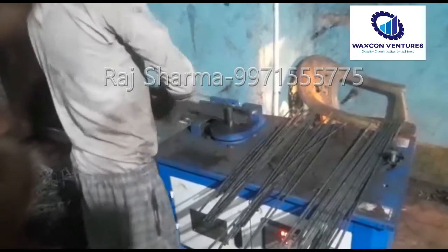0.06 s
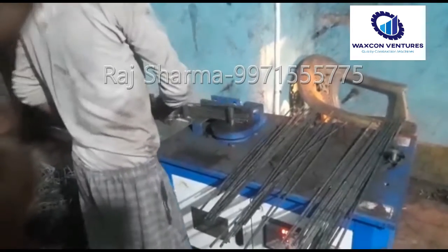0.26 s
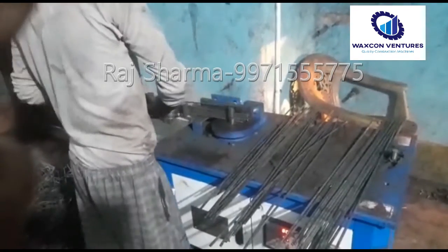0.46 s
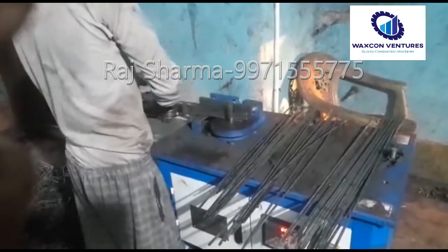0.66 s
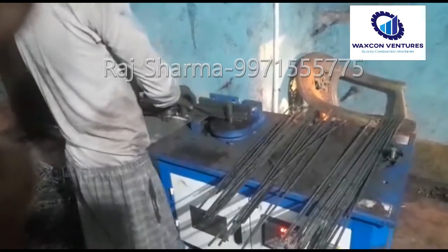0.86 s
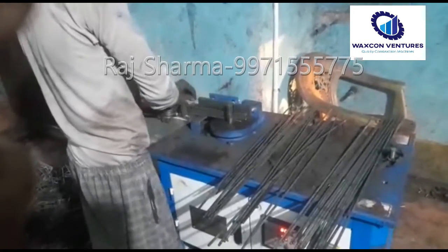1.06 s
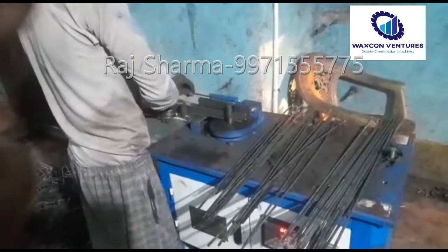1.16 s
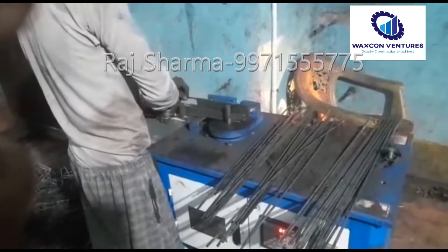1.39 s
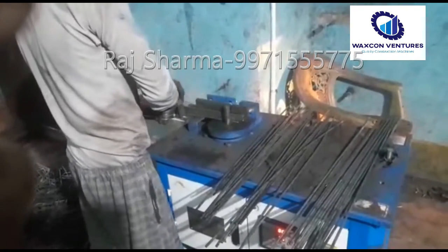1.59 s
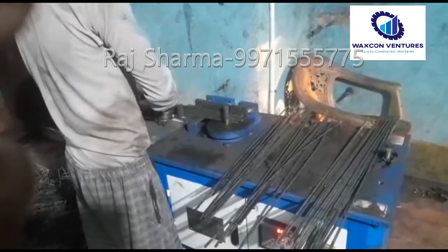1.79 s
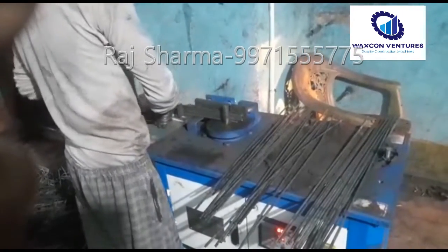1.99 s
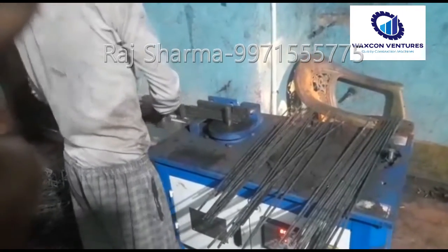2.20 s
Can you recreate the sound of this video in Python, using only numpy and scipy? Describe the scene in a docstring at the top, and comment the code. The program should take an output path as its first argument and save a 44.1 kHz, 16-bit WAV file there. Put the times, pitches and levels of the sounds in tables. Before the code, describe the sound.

Steel rods clank on a metal machine table over a steady motor hum.

```python
"""A hard-walled workshop, where steel rods clank on the steel table of a bending machine.
One heavy triple clank is followed by lighter knocks and clinks as the rods are set in place.
Each impact excites the damped normal modes of table and rods; the bundle's dense modes merge into
a crash that reverberates. A motor hums throughout, over workshop noise and an uneven low rumble."""
import sys
import numpy as np
from scipy import signal
from scipy.fft import rfft, irfft
from scipy.io import wavfile
from scipy.ndimage import uniform_filter1d, map_coordinates

SR = 44100
rng = np.random.default_rng(int(sys.argv[2]) if len(sys.argv) > 2 else 0)


def master_out(mix):
    """Clip the mix to full scale and print it as 16-bit PCM to the path in sys.argv[1]."""
    frames = np.transpose(np.atleast_2d(mix))
    ceiling = np.clip(frames, -1, 1)
    pcm = np.round(ceiling * 32767).astype(np.int16)
    wavfile.write(sys.argv[1], SR, pcm)


N = 99225
TIME, BIN_HZ = np.arange(N) / SR, np.fft.rfftfreq(N, 1 / SR)

# Bands of the impact spectrum, from thud to sizzle: (frequency [Hz])
IMPACT_BANDS = [400, 900, 1150, 1700, 2900, 5000, 11000]
# Impacts of rod on steel: (time [s], level in each of the seven bands [dB],
# free ringing of the rods [dB], note of the struck spot [Hz], level of that note [dB])
IMPACTS = [(0.040, -10.5, -17.5, -16.5, -15.5, -40, -19, -26, 13, 4430, -38),
           (0.178, -12.5, -26, -13, -20, -26, -20, -27.5, -3, 10230, -40.5),
           (0.229, -16, -1, -3.5, -1.5, -9, -5.5, -6.5, 4.5, 1045, -6),
           (0.263, -1, 3, -5, 7, -3, -1, -2, -18, 2604, -9),
           (0.276, 2.5, -3.5, -8, -15, -2, -10, -4, -5, 926, -12),
           (0.300, -4.5, -46, -15, -22, -28, -13, -6, -8, 2670, -17),
           (0.335, -2, -3.5, -26, -26, -7.5, -1.5, -4, -4, 1049, -12),
           (0.344, -19, -4, -8.5, -2, -12, -18, -1, -1, 1097, -7.5),
           (0.371, -12.5, -15, -38, -15, -19.5, -0.5, -11.5, 10, 5250, -40),
           (0.870, -37, -25, -27, -32, -23, -26.5, -21.5, -7, 12900, -41),
           (1.381, -16.5, -38, -28, -26, -28, -15, -17, 9, 13600, -34),
           (1.419, -4.5, -12, -13, -24, -7.5, -15.5, -14.5, 0, 2940, -24.5),
           (1.599, -23, -35, -31, -23, -19.5, -21, -28, -14, 4900, -39),
           (1.623, -16.5, -59, -31, -32, -43, -26, -21, -1, 10000, -37),
           (1.681, -9, -13, -20, -51, -5, -16.5, -19, 0, 3082, -21),
           (1.775, -4, -17, -19.5, -10.5, -18.5, -7, 0, -11, 9500, -22.5),
           (2.162, -14, -27, -43, -19.5, -25, -30, -42, 3, 327, -26)]
def struck_modes(modes, extra_db, scatter_db, rise_s):
    """Modal superposition: every impact excites the same damped modes in a different balance."""
    out, t = np.zeros((2, N)), np.arange(SR) / SR
    detune = 0.00197  # relative spread of frequency from impact to impact
    for hz, db, t60 in modes:
        mode = np.zeros((2, N))
        envelope = undb(db) * decay(t, t60) * (1 - np.exp(-t / rise_s))
        draws = rng.standard_normal((len(IMPACTS), 4))
        for (start, *spectrum, _, _, _), extra, draw in zip(IMPACTS, extra_db, draws):
            tune, size, phase, skew = draw
            strength = undb(at_hz(hz, IMPACT_BANDS, spectrum) + extra + scatter_db * size)
            add(mode, start, tone(t, hz * (1 + detune * tune), phase, skew) * envelope * strength)
        out += mode * flutter(hz)
    return out


# Normal modes of the steel table: (frequency [Hz], level [dB], decay time T60 [s])
TABLE_RESONANCES = [(260.7, -40, 1.1), (308.6, -35.5, 1.32), (405.5, -27.5, 0.79), (422.6, -31.5, 1.18),
                    (448, -39, 0.56), (490.8, -31.5, 0.78), (522, -51.5, 0.87), (591, -41, 1),
                    (865, -32.5, 0.45), (905, -30.5, 0.85), (930, -27, 0.47), (961, -34, 0.35),
                    (1084, -30.5, 1.05), (1178, -30, 0.44), (1639, -27, 0.21), (1640, -41, 0.64),
                    (2070, -40, 0.83)]
def steel_table():
    """Plate vibration: the ring builds as each impact spreads through the table."""
    return struck_modes(TABLE_RESONANCES, np.full(len(IMPACTS), 2.5), scatter_db=1.5, rise_s=0.015)


# Normal modes of the rods: (frequency [Hz], level [dB], decay time T60 [s])
ROD_RESONANCES = [(2530, -35, 1), (2597, -29.5, 0.43), (2550, -30, 0.47), (3130, -28, 0.48),
                  (3160, -35, 0.32), (3500, -56, 0.13), (4020, -33.5, 0.76), (4200, -43, 0.32),
                  (4680, -43, 0.28), (5240, -47.5, 1), (5580, -45, 0.8), (6290, -37, 0.27),
                  (10160, -39, 0.5), (11413, -40, 0.45), (11930, -45, .3), (12030, -32.5, 0.41),
                  (12700, -36.5, 0.41), (13900, -37, 0.48), (15580, -32, 0.32)]
def rods():
    """Free vibration of bars: each contact favours different modes of the rods."""
    free_db = np.array([free for *_, free, _, _ in IMPACTS])
    return struck_modes(ROD_RESONANCES, free_db - 2, scatter_db=3, rise_s=0.001)


def struck_spots():
    """Local resonance: each struck spot sounds a heavily damped note that leaves a trace in the room."""
    out, t = np.zeros((2, N)), np.arange(SR // 2) / SR
    envelope = decay(t, t60=0.04) + undb(-14) * decay(t, t60=0.34)
    for (start, *_, hz, db), (phase, skew) in zip(IMPACTS, rng.standard_normal((len(IMPACTS), 2))):
        add(out, start, tone(t, hz, phase, skew) * undb(db) * envelope * swell(t, hz))
    return out


# Crash of the rod bundle: (frequency [Hz], third-octave level [dB], crash T60 [s],
# room tail relative to the crash [dB], room T60 [s])
BUNDLE_BANDS = [(148, -44, .2, -1.5, 1.0), (267, -47, 0.16, -3, 1.0), (444, -24, 0.29, -6, 1.0),
                (756, -35.5, 0.2, -12.5, 1), (1057, -23, 0.12, -5, 1), (1560, -32, 0.13, -6.5, 0.99),
                (2750, -24, 0.075, -3.5, 0.74), (5480, -22.5, 0.13, -5.5, 0.74),
                (8200, -37, 0.13, -8.5, 0.24), (10510, -21, 0.11, -12, 0.57), (13100, -20, 0.073, -8, 0.27),
                (16000, -31.5, 0.054, -19, 0.31)]
def bundle_clatter():
    """Modal overlap: the bundle's close modes merge into a brief noise that lingers as reverberation."""
    out = np.zeros((2, N))
    points, *columns = np.array(BUNDLE_BANDS).T
    spacing_hz, ripple_db, ripple_from_hz, room_rise_s = 55.31, 6.5, 5400, 0.004
    peaks = map_coordinates(rng.standard_normal(2048), [BIN_HZ / spacing_hz], order=1, mode="mirror")
    # single modes stand out more in the treble
    ripple = undb(ripple_db * peaks * BIN_HZ / np.hypot(BIN_HZ, ripple_from_hz))
    for hz in 160 * 2 ** (np.arange(21) / 3):
        db, crash_t60, room_db, room_t60 = (at_hz(hz, points, column) for column in columns)
        crash = decay(TIME, crash_t60)
        room = undb(room_db) * decay(TIME, room_t60) * (1 - np.exp(-TIME / room_rise_s))
        impact_power = (crash ** 2 + room ** 2) * swell(TIME, hz) ** 2
        power = np.zeros((1, N))
        for start, *spectrum, _, _, _ in IMPACTS:  # incoherent sounds add in power
            add(power, start, impact_power[None] * undb(at_hz(hz, IMPACT_BANDS, spectrum)) ** 2)
        band = np.sqrt(np.maximum(1 - 3 * abs(np.log2((BIN_HZ + 1) / hz)), 0))
        out += undb(db) * np.sqrt(power) * stereo_noise(band * ripple, stereo_width(BIN_HZ))
    return out


# Spectral lines of the motor: (frequency [Hz], level [dB])
MOTOR_LINES = [(99, -58.5), (316, -45), (411, -54), (452, -50.5), (526, -60.5), (737, -66), (1174, -60.5)]
def motor():
    """Random modulation: each line of the hum wavers in amplitude and phase."""
    out, depth = np.zeros(N), 1.1
    for hz, db in MOTOR_LINES:
        waver = 1 + depth * (wander(per_s=15) + 1j * wander(per_s=15))
        line = np.real(waver * np.exp(2j * np.pi * hz * TIME))
        out += undb(db) * line / line.std()
    return out


# Spectrum of the workshop noise: (frequency [Hz], relative spectral density [dB])
NOISE_SPECTRUM = [(30, -35), (100, -6.5), (200, 0.5), (300, 3), (450, 2), (620, -2.5), (1200, -5),
                  (1600, -11.5), (2800, -6.5), (5000, -15.5), (6200, -20), (7400, -34), (11000, -29),
                  (16000, -34)]
# Envelope of the workshop noise: (time [s], level [dB])
NOISE_ENVELOPE = [(0, -37.5), (.7, -38.5), (1.05, -41.5), (1.35, -41.5), (1.75, -39.5), (1.95, -37),
                  (2.25, -38)]
def workshop_noise():
    """Broadband noise: machines give a continuous spectrum whose level drifts slowly."""
    return shaped_noise(NOISE_SPECTRUM, NOISE_ENVELOPE, stereo_width(BIN_HZ))


# Spectrum of the rumble: (frequency [Hz], relative spectral density [dB])
RUMBLE_SPECTRUM = [(20, -25), (45, -2), (90, -1), (170, -1.5), (260, -15.5), (600, -49)]
# Envelope of the rumble: (time [s], level [dB])
RUMBLE_ENVELOPE = [(0, -39.5), (.1, -40), (.135, -33), (.21, -33), (.3, -42), (.52, -38.5), (.62, -43),
                   (.76, -54.5), (.96, -43.5), (1.02, -50), (1.3, -50.5), (1.52, -52), (1.72, -56.5),
                   (1.89, -37.5), (1.96, -42.5), (2.05, -51), (2.25, -55)]
def rumble():
    """Amplitude modulation: low-frequency noise swells and sinks unevenly, louder on the right."""
    return shaped_noise(RUMBLE_SPECTRUM, RUMBLE_ENVELOPE, width=0.89) * undb(-1) * pan(right_db=5.5)


def decay(t, t60):
    """Exponential damping: the amplitude falls 60 dB in t60 seconds."""
    return np.exp(-np.log(1000) * t / t60)


def swell(t, hz):
    """Onset transient: a ring builds over some cycles, and the heavy table's thud starts slowly."""
    contact_s, cycles, thud_rise_s, thud_below_hz = 0.00042, 2.6, 0.032, 600
    rise_s = contact_s + cycles / hz + thud_rise_s * (hz < thud_below_hz)
    return 1 - np.exp(-t / rise_s)


def flutter(hz, depth_db=4.5, per_s=35):
    """Interference: wall reflections make a ring waver, alike on both sides in the bass."""
    width = stereo_width(hz)
    separate = np.array([wander(per_s), wander(per_s)])
    shared = np.sqrt(1 - width ** 2) * wander(per_s)
    return undb(depth_db * (shared + width * separate))


def tone(t, hz, phase, skew):
    """Harmonic motion: one mode, with a phase difference between the two sides."""
    left_shift = 2 * skew * stereo_width(hz) - left_lag(hz)
    return np.sin(2 * np.pi * (hz * t + phase) + np.array([[left_shift], [0]]))


def left_lag(hz, delay_s=0.000307, above_hz=3600):
    """Stereo offset: the phase, in radians, by which the treble trails on the left."""
    return 2 * np.pi * hz * delay_s * (hz > above_hz)


def stereo_width(hz, corner_hz=1570):
    """Decorrelation: the sides differ more as frequency rises, from 0 to 1."""
    return hz / np.hypot(hz, corner_hz)


def pan(right_db):
    """Level difference: a pair of gains with the right side louder by right_db."""
    return undb(np.array([[-.5], [.5]]) * right_db)


def stereo_noise(gain, width):
    """Partial coherence: mid and side noise combine into a filtered pair of rms 1."""
    mid, side = rfft(rng.standard_normal((2, N)))
    left = (mid + width * side) * np.exp(-1j * left_lag(BIN_HZ))
    right = mid - width * side
    noise = irfft(np.array([left, right]) * gain, N)
    return noise / noise.std()


def shaped_noise(spectrum, envelope, width):
    """Spectral shaping: noise of constant colour follows a level envelope."""
    gain = undb(at_hz(BIN_HZ, *np.array(spectrum).T))
    level_db = np.interp(TIME, *np.array(envelope).T)
    return stereo_noise(gain, width) * undb(level_db)


def wander(per_s):
    """Random fluctuation: a smoothed curve through per_s Gaussian values a second."""
    knots = rng.standard_normal(512)
    curve = np.interp(TIME * per_s, np.arange(len(knots)), knots)
    return uniform_filter1d(curve, int(SR / per_s / 2) + 1)


def add(out, start_s, sound):
    """Superposition: a sound joins the mix at its start time."""
    i = int(start_s * SR)
    out[:, i:i + sound.shape[1]] += sound[:, :N - i]


def at_hz(hz, points, values):
    """Interpolation on a logarithmic frequency axis."""
    return np.interp(np.log(np.maximum(hz, 1)), np.log(points), values)


def undb(db):
    """Amplitude ratio of a level in decibels."""
    return 10 ** (np.asarray(db) / 20)


def scene():
    """Linear superposition: the clanks add to hum, noise and rumble, a little to the right."""
    clanks = steel_table() + rods() + struck_spots() + undb(0.5) * bundle_clatter()
    return (clanks + motor() + workshop_noise() + rumble()) * pan(right_db=0.53)


def record(dry):
    """Band limiting: a steep elliptic low-pass removes the highest treble."""
    cutoff_hz = 16300
    return signal.sosfilt(signal.ellip(10, .2, 80, cutoff_hz, fs=SR, output="sos"), dry)


dry = scene()
out = record(dry)
master_out(out)
```